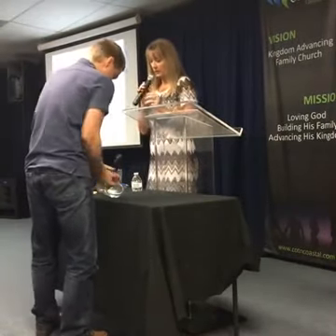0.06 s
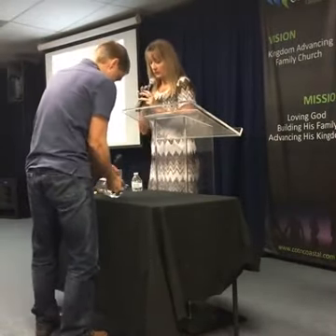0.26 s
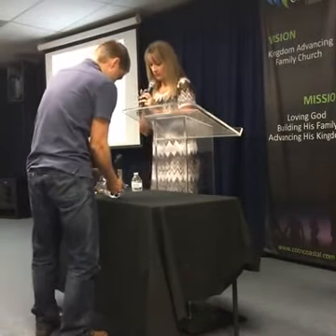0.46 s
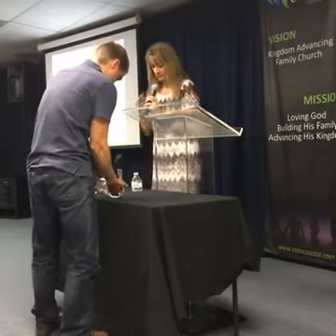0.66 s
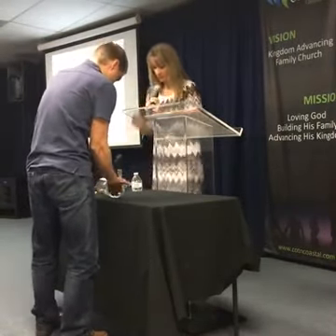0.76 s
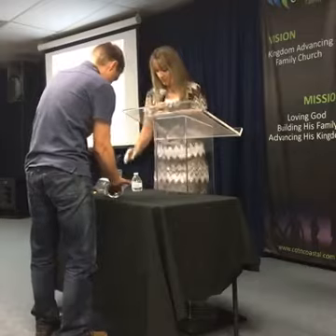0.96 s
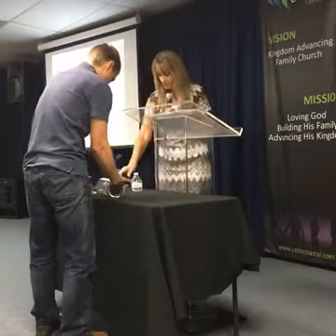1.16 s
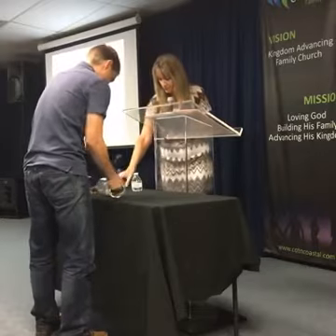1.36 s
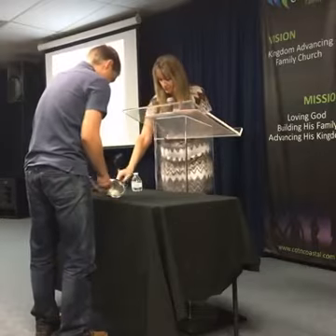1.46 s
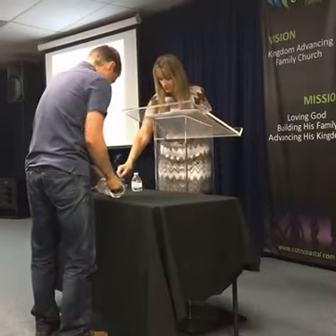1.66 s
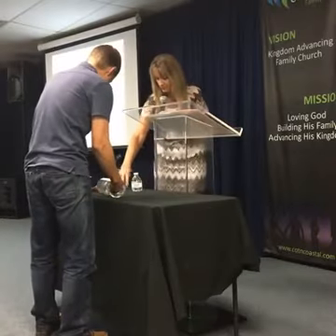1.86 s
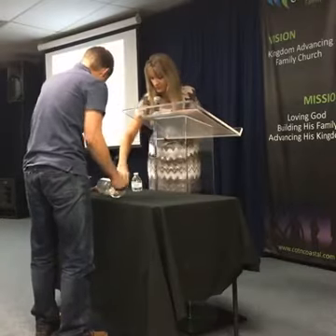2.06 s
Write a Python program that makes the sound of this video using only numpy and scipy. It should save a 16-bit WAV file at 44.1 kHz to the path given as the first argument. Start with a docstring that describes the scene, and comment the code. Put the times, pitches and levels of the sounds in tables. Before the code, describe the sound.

Stones clink and rattle into a glass jar in a hall.

```python
"""Stones dropped and pushed into a glass jar on a cloth-covered table, a few metres from the microphone.
Each contact cracks, rings the jar's wall and thuds in the table. Small stones tumble between the blows;
others click and scuff in the hand. The place is a hall: its short tail follows every contact,
and ventilation rumble and mains hum lie underneath."""
import sys
import numpy as np
from scipy import signal
from scipy.fft import rfft, irfft
from scipy.io import wavfile

SR = 44100
rng = np.random.default_rng(int(sys.argv[2]) if len(sys.argv) > 2 else 0)


def file_out(sig):
    """Save sig as 16-bit WAV at sys.argv[1]."""
    # one column per channel
    cols = np.atleast_2d(sig).T
    # limit, then scale
    lim = np.clip(cols, -1, 1)
    pcm = np.round(lim * 32767).astype(np.int16)
    wavfile.write(sys.argv[1], SR, pcm)


N = 92786

# The hall's ventilation. Each row: frequency in Hz, relative spectral density in dB.
VENT_SPECTRUM = [(15, -17), (25, -17), (49, 1.5), (121, -7.5), (146, -14), (218, -15.5), (278, -22.5),
                 (309, -21.5), (335, -23.5), (501, -25.5), (604, -31), (811, -31), (1500, -37),
                 (1860, -35.5), (2780, -41.5), (6370, -46.5), (15000, -56)]
# Mains hum. Each row: frequency in Hz, RMS level in dB.
MAINS_HUM = [(59.5, -54), (120, -58)]
# The colour of stone on stone. Each row: frequency in Hz, relative level in dB.
STONE_SPECTRUM = [(800, -42), (2000, -22), (2900, -14), (3500, 1.5), (4600, -4), (6500, -7), (9000, -16),
                  (12000, -49)]
# Clicks in the hand. Each row: start in seconds, level in dB, treble tilt in dB per octave.
HAND_CLICKS = [(.1321, -66, 9), (0.3677, -61, -16), (0.4787, -37.5, -6.5), (0.5116, -46, -13.5),
               (0.526, -48.5, -14), (0.6954, -54, -13), (0.8114, -54, -13), (0.848, -46, 5)]
# Scuffs in the palm. Each row: start and length in seconds, level in dB, treble tilt in dB per octave.
PALM_SCUFFS = [(0.0, .11, -69.5, -2), (0.109, 0.049, -62.5, -1), (.2, 0.038, -67.5, 4),
               (0.23, 0.043, -80, 19), (.485, 0.071, -65.5, 2.5), (0.787, 0.068, -68, 5),
               (0.851, 0.042, -64, 4.5)]
# The rise and fall of the settling pile. Each row: time in seconds, contact level in dB.
TUMBLE_LEVELS = [(.89, -47), (1.0, -52), (1.11, -32), (1.19, -35), (1.3, -34.5), (1.42, -53),
                 (1.498, -46.5), (1.598, -40.5), (1.65, -76), (1.75, -59), (1.8, -50), (1.9, -44.5),
                 (2.031, -44.5), (2.1, -76)]
# The crack of stone on glass. Each row: frequency in Hz, relative level in dB.
CRACK_SPECTRUM = [(300, -30), (700, -9), (1100, -10), (1500, 3.5), (2200, 0), (3300, 0), (5000, 0),
                  (6000, -5), (7000, 6.5), (8500, -16.5), (9600, -15.5), (11200, -9), (12600, -18.5),
                  (14500, -39)]
# The jar's modes. One entry each: pitch in Hz, level within its register in dB, T60 in seconds.
MODE_HZ = [1593, 1626, 2973, 3934, 3992, 4460, 5015, 5368, 5459, 6615, 6722, 7075, 7651, 8346, 8470, 8878,
           9908, 11013, 13540]
MODE_DB = [-3, -11.5, -9, -10, -5, -37, -5, -11.5, -14, -19, -9, -4, -23, -10.5, -13.5, -16.5, -30, -23,
           -47]
MODE_T60_S = [0.15, 0.13, 0.12, 0.13, 0.12, 0.042, 0.061, 0.063, 0.2, 0.081, 0.1, 0.12, 0.09, 0.092, 0.14,
              0.19, 0.26, 0.15, 0.097]
# The jar's four registers. In Hz: end of the low, both edges of the second and middle, start of the top.
REGISTER_EDGES_HZ = (1700, 2900, 3200, 3800, 5500, 6600)
# Stone on glass. Each row: start in seconds, then the low, second, middle and top register levels in dB.
JAR_BLOWS = [(0.7179, -43, -51, -37, -54), (0.7285, -36.5, -36.5, -38, -57), (0.8136, -62, -55, -57, -68),
             (.8890, -30.5, -17.5, -17.5, -19.5), (0.8926, -27, -34, -15.5, -18),
             (0.9089, -55, -54, -33, -22), (0.919, -32, -20, -35, -15.5), (0.9492, -44, -23, -58, -32),
             (0.9581, -31.5, -27, -16, -23.5), (.991, -74, -21, -42, -61), (1.0258, -35.5, -30.5, -28, -34),
             (1.0521, -30.5, -33, -30.5, -41.5), (1.080, -42, -36, -25, -33),
             (1.092, -49, -39, -29.5, -29.5), (1.1286, -36, -24, -22.5, -32), (1.141, -26.5, -25, -31, -56),
             (1.151, -58, -21, -21, -34.5), (1.165, -39, -34, -41, -35), (1.181, -28.5, -54, -23, -25),
             (1.191, -29.5, -33, -25.5, -20.5), (1.209, -35, -31, -24.5, -24.5),
             (1.224, -35, -49, -25, -52), (1.2456, -30.5, -28.5, -25, -31), (1.277, -42.5, -45, -26, -33),
             (1.29, -33, -31, -40, -25), (1.304, -33, -29, -26.5, -41), (1.3653, -70, -33, -32, -37),
             (1.382, -37, -35, -34, -34), (1.397, -65, -37, -36, -63), (1.4408, -37, -31.5, -29.5, -33),
             (1.4631, -38, -26, -22.5, -20), (1.494, -33.5, -51, -29.5, -35),
             (1.5238, -45.5, -55, -29.5, -29), (1.5434, -35.5, -59, -36, -27), (1.586, -59, -59, -35, -54),
             (1.6, -55, -43, -37.5, -62), (1.755, -49, -43, -41, -45), (1.7700, -31.5, -33, -28.5, -28),
             (1.8088, -41, -33, -31.5, -33), (1.8427, -27.5, -33.5, -22, -26.5),
             (1.856, -31, -27, -37, -25.5), (1.8881, -61.5, -23, -29, -31), (1.902, -35.5, -35, -26.5, -29),
             (1.931, -43, -35, -35, -43), (1.944, -35.5, -52, -32.5, -39.5), (1.976, -34.5, -49, -30, -38),
             (1.9865, -45.5, -23.5, -27.5, -45), (2.006, -52, -31.5, -43, -41),
             (2.0338, -36, -25.5, -33, -34), (2.046, -73, -35, -46.5, -48)]

VENT_DB = -50.5
HALL_DB, HALL_T60_S, HALL_TREBLE_T60_S, HALL_BUILD_S = -9, 0.39, 0.23, 0.0064
CLICK_S, CLICK_TAIL_DB, CLICK_TAIL_S = 0.0034, -23, 0.015
TUMBLE_SCATTER_DB, TUMBLE_LOW_DB, TUMBLE_TOP_DB = 2, -1.5, -4.5
TWIN_SPREAD_HZ, TWIN_DB, LOAD_DETUNE, SPOT_SCATTER_DB, RING_ATTACK_S = 20.7, -7, 0.0011, 1, 0.00066
CRACK_DB, CRACK_S, GRIND_DB, GRIND_S = -8.5, 0.0024, -12, 0.025
THUD_HZ, THUD_DB, THUD_T60_S = 178.3, -30, 0.25  # level relative to the blow's middle register
LOW_CUT_HZ, HIGH_CUT_HZ = 37.6, 14900


def undb(db):
    """Decibels to gain."""
    return 10 ** (np.asarray(db) / 20)


def fade(t, t60):
    """Exponential decay by 60 dB in t60 seconds."""
    return np.exp(-np.log(1000) * t / t60)


def add(out, start, sound):
    """Mix a sound in at its start time."""
    i = min(max(int(start * SR), 0), N)
    out[i:i + len(sound)] += sound[:N - i]


def shaped(x, spectrum, extra_db=lambda hz: 0):
    """Colour a sound with a (Hz, dB) spectrum at equal power, then with the curve extra_db."""
    size = len(x)
    hz, points = np.maximum(np.fft.rfftfreq(size, 1 / SR), 1), np.array(spectrum)
    gain = undb(np.interp(np.log(hz), np.log(points[:, 0]), points[:, 1]))
    gain /= np.sqrt(np.mean(gain ** 2))
    cepstrum = irfft(np.log(gain * undb(extra_db(hz))), size)
    cepstrum[1:size // 2] *= 2  # folded to minimum phase, so attacks stay clean
    cepstrum[size // 2 + 1:] = 0
    return irfft(rfft(x) * np.exp(rfft(cepstrum)), size)


def room_tone():
    """The hall's steady floor at the microphone: ventilation rumble and mains hum."""
    t = np.arange(N) / SR
    hum = sum(undb(db) * np.sqrt(2) * np.sin(2 * np.pi * (hz * t + rng.random())) for hz, db in MAINS_HUM)
    return undb(VENT_DB) * shaped(rng.standard_normal(N), VENT_SPECTRUM) + hum


def hall_tail(direct, size=32768, split_hz=5000):
    """The hall from a few metres off: a diffuse tail whose treble dies first."""
    t = np.arange(size) / SR
    low = signal.sosfilt(signal.butter(2, split_hz, fs=SR, output="sos"), rng.standard_normal(size))
    high = signal.sosfilt(signal.butter(2, split_hz, "high", fs=SR, output="sos"),
                          rng.standard_normal(size))
    tail = low * fade(t, HALL_T60_S) + high * fade(t, HALL_TREBLE_T60_S)
    tail *= 1 - np.exp(-t / HALL_BUILD_S)
    return undb(HALL_DB) * signal.fftconvolve(direct, tail / np.sqrt(np.sum(tail ** 2)))[:N]


def stone_on_stone(envelope, db, tilt):
    """Two stones meet without ringing: a noise burst, its spectrum tilted above 2 kHz."""
    colour = lambda hz: db + tilt * np.log2(np.maximum(hz, 2000) / 4000)
    return shaped(envelope * rng.standard_normal(len(envelope)), STONE_SPECTRUM, colour)


def stones_in_hand(size=8192):
    """Stones knock together in dry clicks and rub in soft scuffs."""
    out, t = np.zeros(N), np.arange(size) / SR
    snap = np.exp(-t / CLICK_S) + undb(CLICK_TAIL_DB) * np.exp(-t / CLICK_TAIL_S)
    for start, db, tilt in HAND_CLICKS:
        add(out, start, stone_on_stone(snap, db, tilt))
    for start, length, db, tilt in PALM_SCUFFS:
        swell = np.sin(np.pi * np.minimum(t / length, 1))
        add(out, start, stone_on_stone(swell, db, tilt))
    return out


def tumble(count=80):
    """Small stones touch the glass at random moments while the pile settles."""
    out = np.zeros(N)
    times, levels = np.array(TUMBLE_LEVELS).T
    progress = (np.arange(count) + rng.random(count)) / count
    for start in times[0] + progress * (times[-1] - times[0]):
        db = np.interp(start, times, levels) + TUMBLE_SCATTER_DB * rng.standard_normal()
        add(out, start, stone_on_glass(db + TUMBLE_LOW_DB, db, db, db + TUMBLE_TOP_DB, size=6144))
    return out


def glass_ring(t, colour):
    """The jar's wall rings in twin modes, slightly apart in pitch, that beat as they die away."""
    hz, db, t60 = np.array([MODE_HZ, MODE_DB, MODE_T60_S])[:, :, None]
    spot, load, twin = rng.standard_normal((3, len(hz), 1))
    swing = lambda f: np.sin(2 * np.pi * (f * t + rng.random(f.shape)))
    pitch = hz * (1 + LOAD_DETUNE * load)  # the stones' load shifts the pitch
    pairs = swing(pitch) + undb(TWIN_DB) * swing(pitch + TWIN_SPREAD_HZ * twin)
    gain = undb(db + colour(hz) + SPOT_SCATTER_DB * spot)  # the spot struck weights the modes
    ring = np.sum(gain * pairs * fade(t, t60), axis=0)
    return ring * (1 - np.exp(-t / RING_ATTACK_S))


def stone_on_glass(low_db, second_db, mid_db, top_db, size=8192):
    """One contact: a crack and short grind, the ring of the wall, a thud in the table beneath."""
    t = np.arange(size) / SR
    edge_db = [low_db, second_db, second_db, mid_db, mid_db, top_db]
    colour = lambda hz: np.interp(hz, REGISTER_EDGES_HZ, edge_db)
    contact = undb(CRACK_DB) * np.exp(-t / CRACK_S) + undb(GRIND_DB) * np.exp(-t / GRIND_S)
    crack = shaped(contact * rng.standard_normal(size), CRACK_SPECTRUM, colour)
    ring = glass_ring(t, colour)
    thud_hz = THUD_HZ * (1 + 0.149 * rng.standard_normal())
    thud = np.sin(2 * np.pi * thud_hz * t) * fade(t, THUD_T60_S)
    return crack + ring + undb(THUD_DB + mid_db) * thud


def jar_blows():
    """The main source: stones strike the glass as they are dropped and pushed in."""
    out = np.zeros(N)
    for start, *levels in JAR_BLOWS:
        add(out, start, stone_on_glass(*levels))
    return out


def scene():
    """What reaches the one microphone: room tone, the stones and jar direct, and the hall's tail."""
    floor = room_tone()
    direct = stones_in_hand() + jar_blows() + tumble()
    return (direct + hall_tail(direct) + floor)[None]


def record(dry):
    """The recorder cuts the deepest bass and the highest treble."""
    x = signal.sosfilt(signal.butter(4, LOW_CUT_HZ, "high", fs=SR, output="sos"), dry)
    return signal.sosfilt(signal.ellip(8, .2, 70, HIGH_CUT_HZ, fs=SR, output="sos"), x)


dry = scene()
out = record(dry)
file_out(out)
```